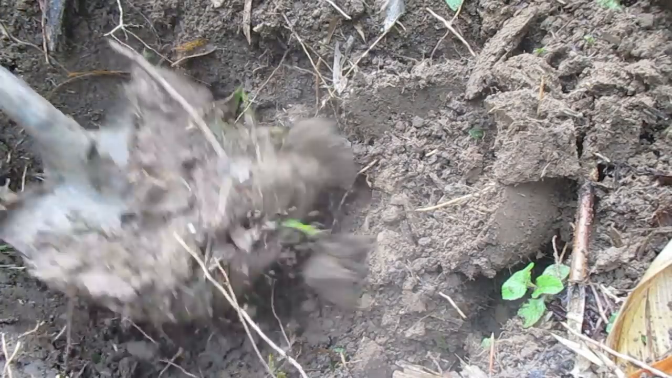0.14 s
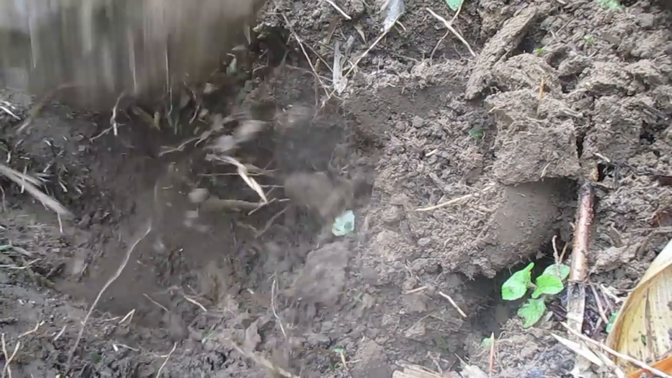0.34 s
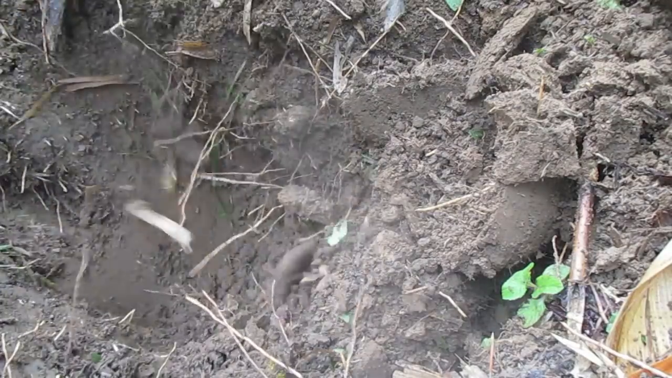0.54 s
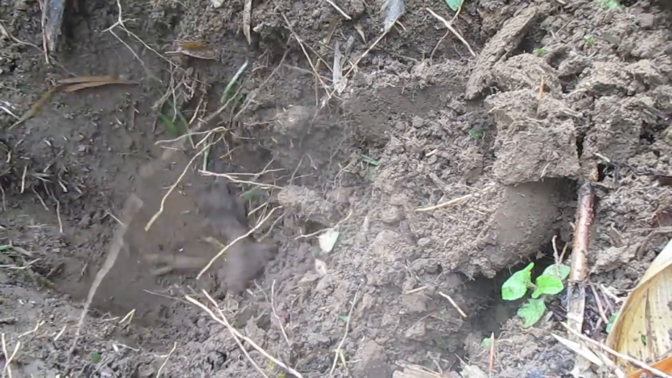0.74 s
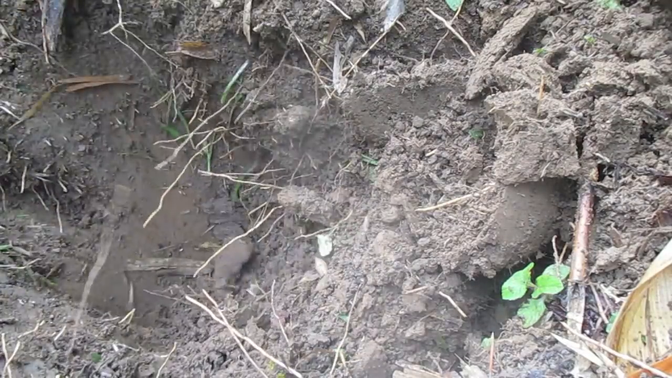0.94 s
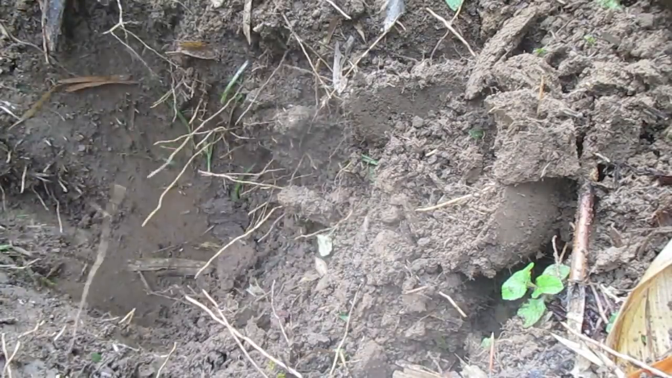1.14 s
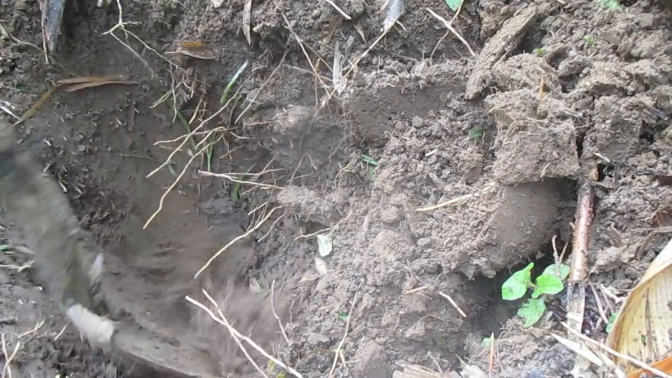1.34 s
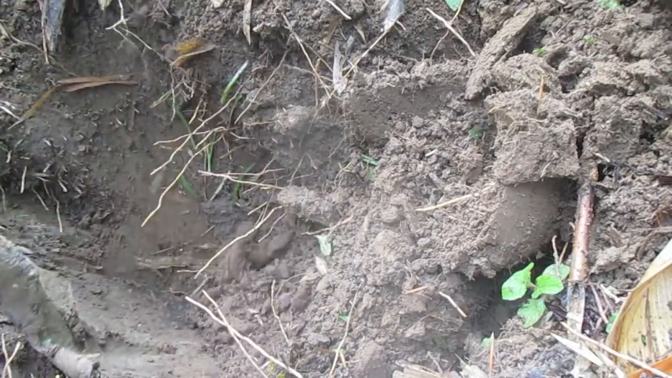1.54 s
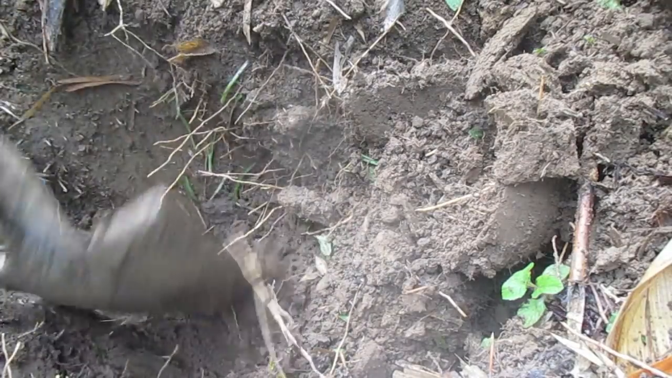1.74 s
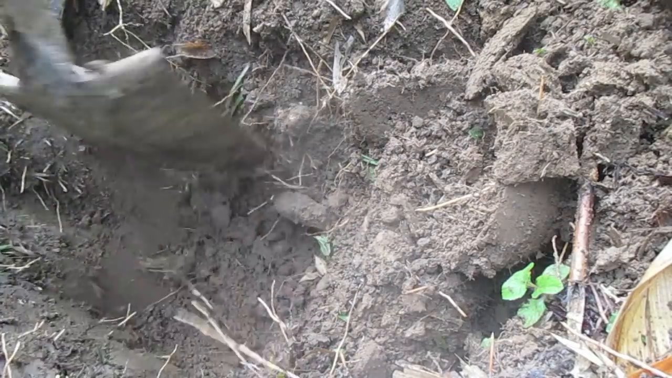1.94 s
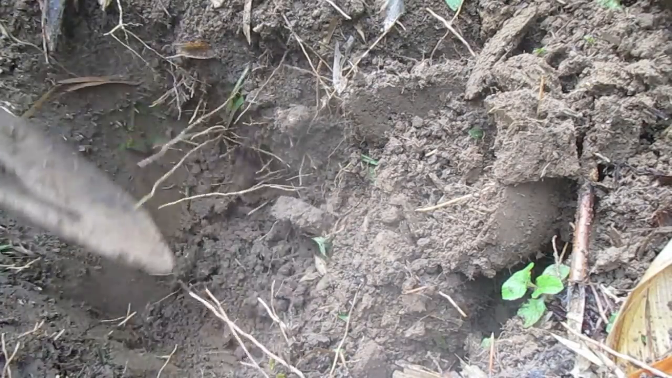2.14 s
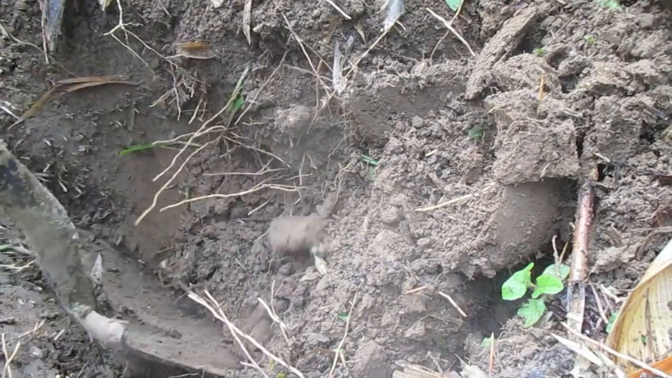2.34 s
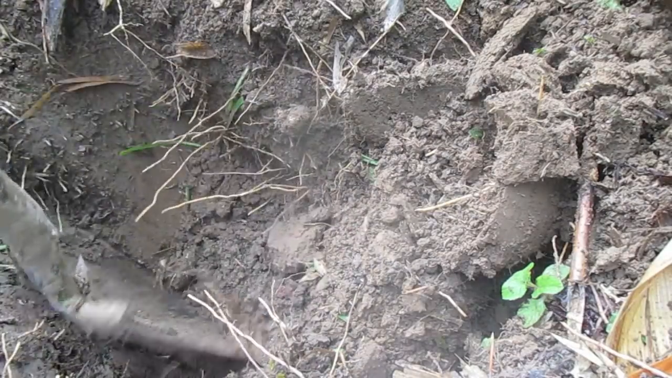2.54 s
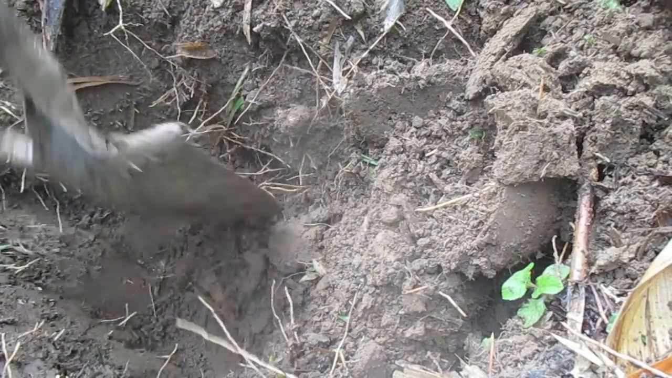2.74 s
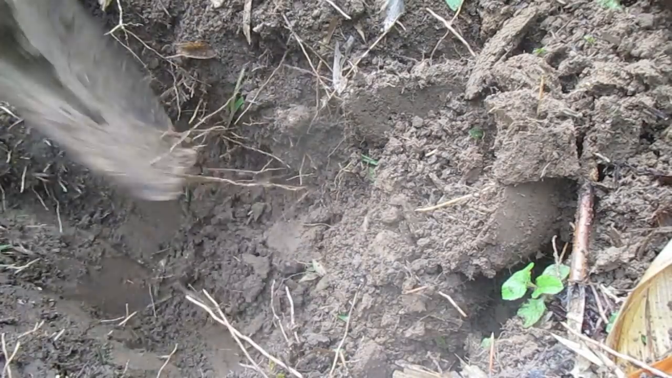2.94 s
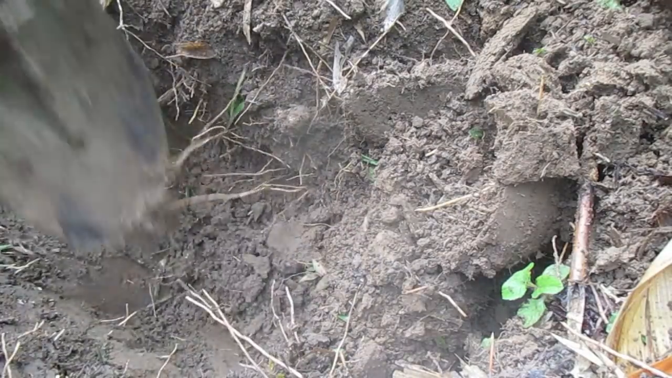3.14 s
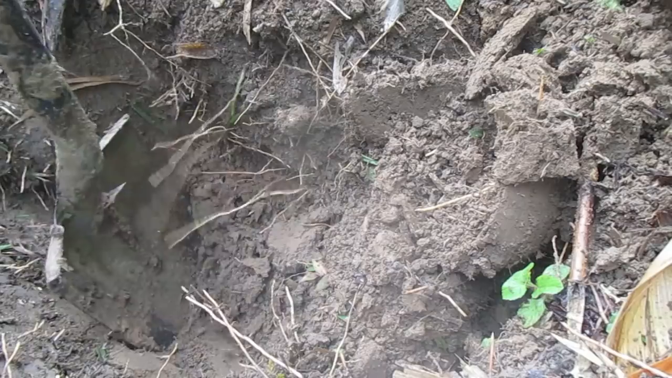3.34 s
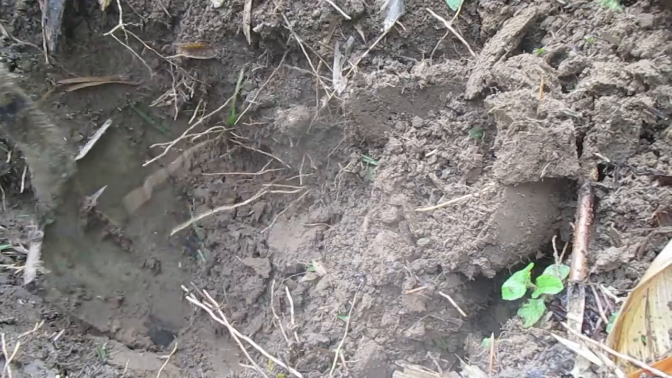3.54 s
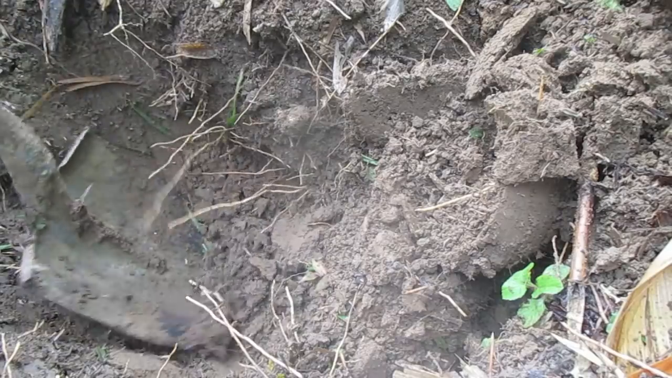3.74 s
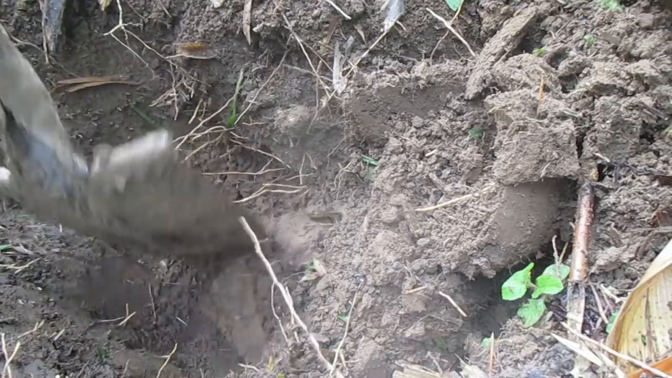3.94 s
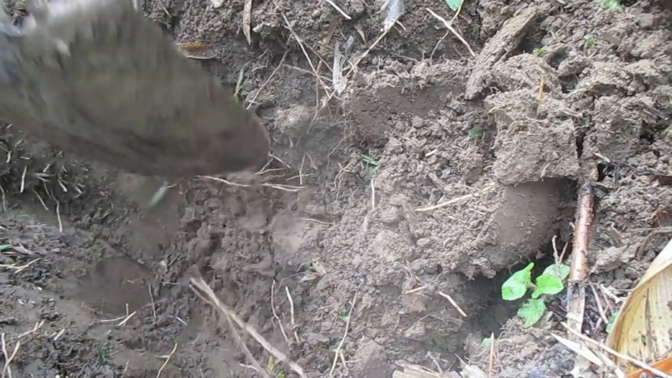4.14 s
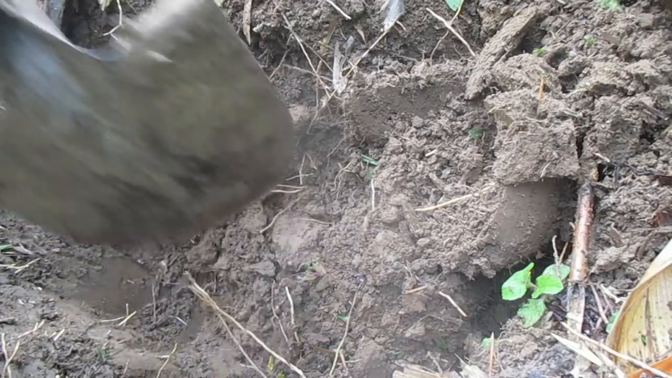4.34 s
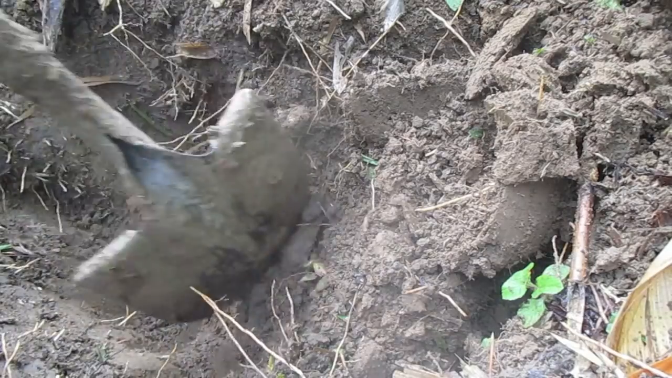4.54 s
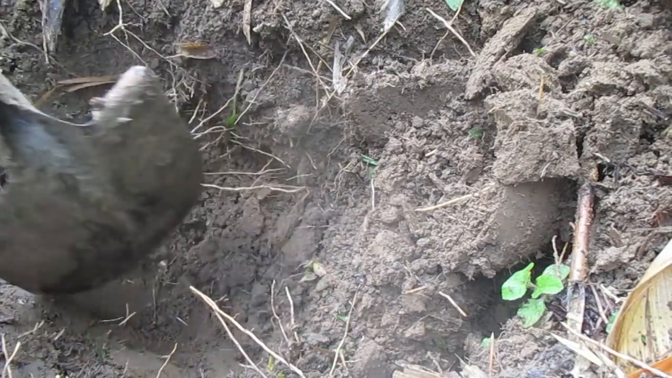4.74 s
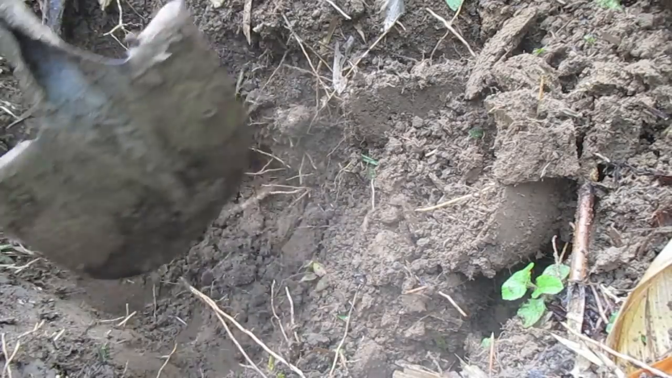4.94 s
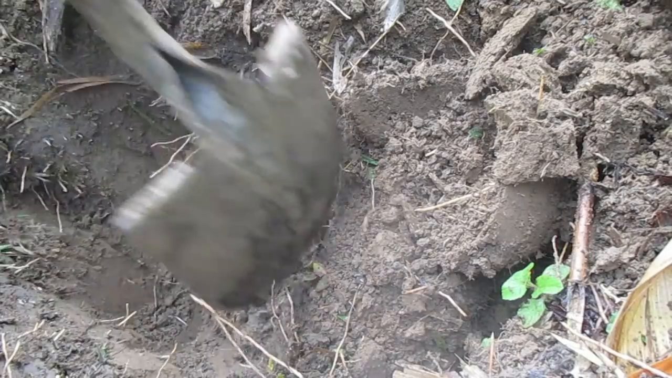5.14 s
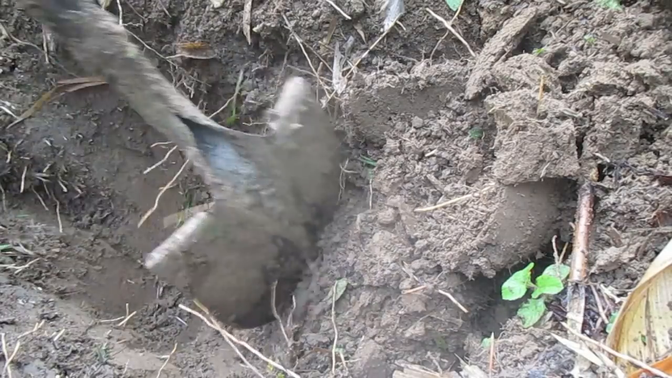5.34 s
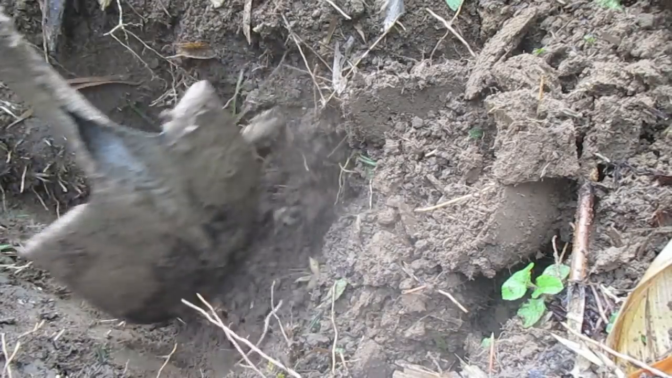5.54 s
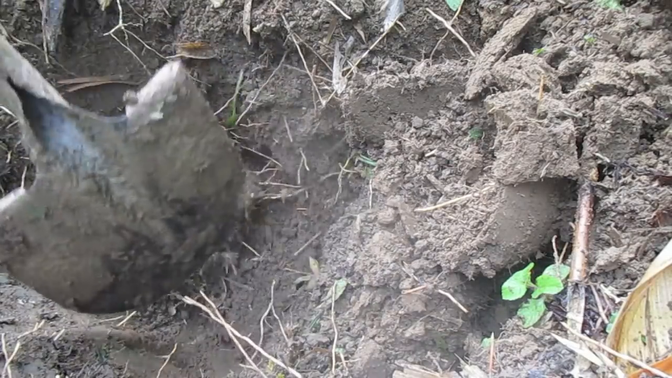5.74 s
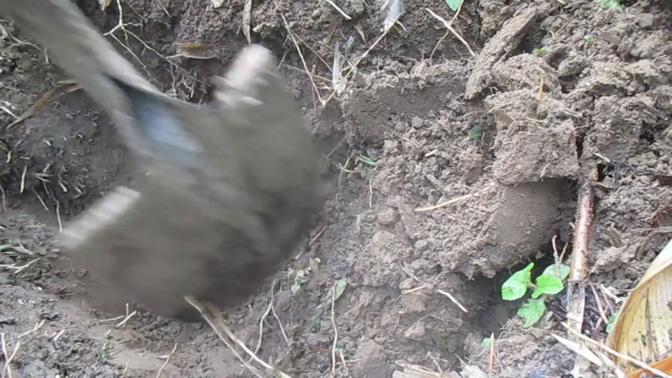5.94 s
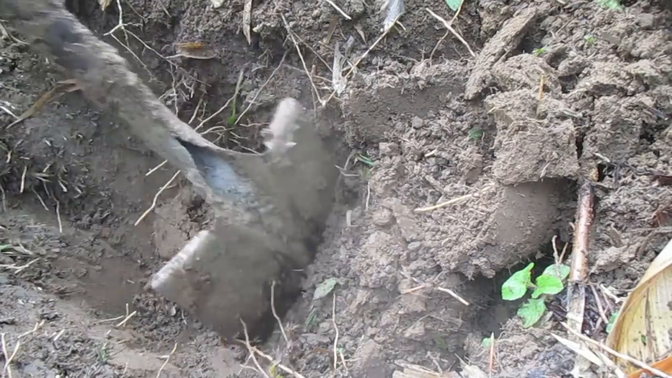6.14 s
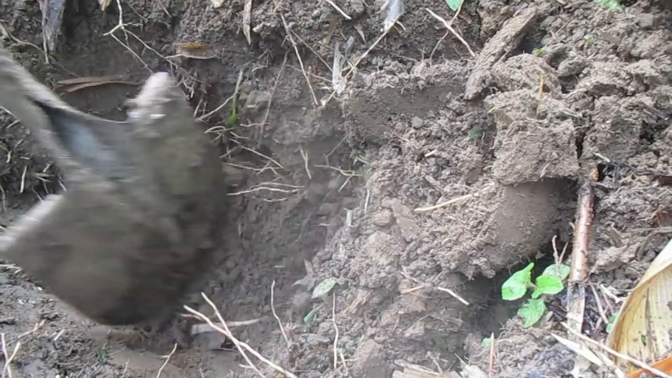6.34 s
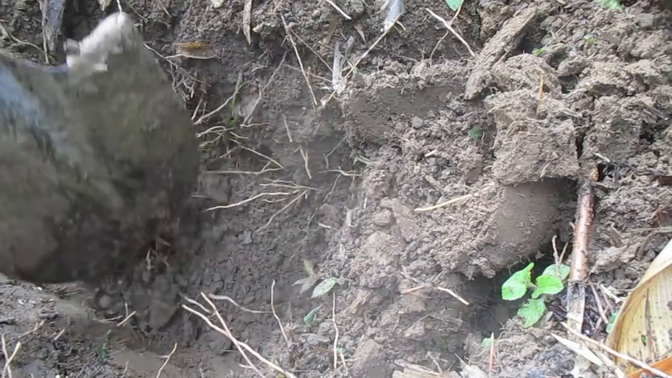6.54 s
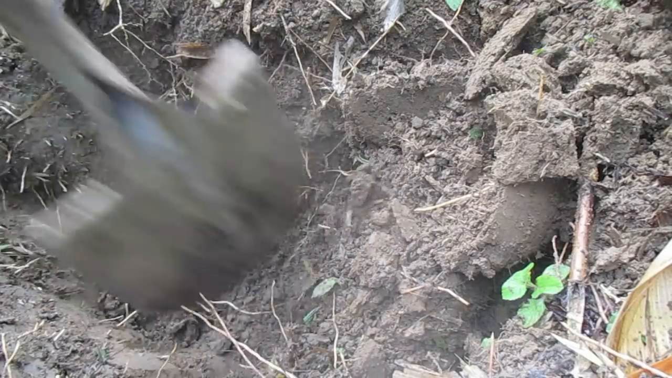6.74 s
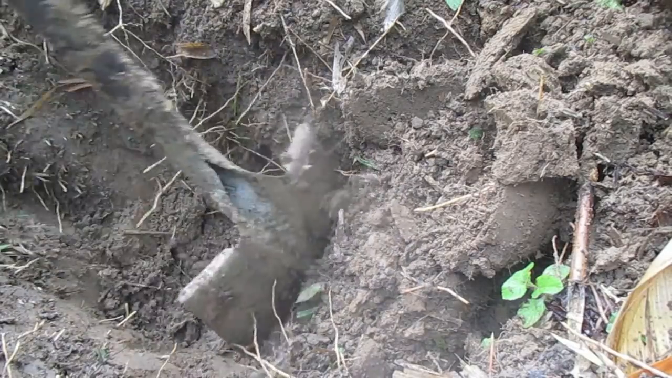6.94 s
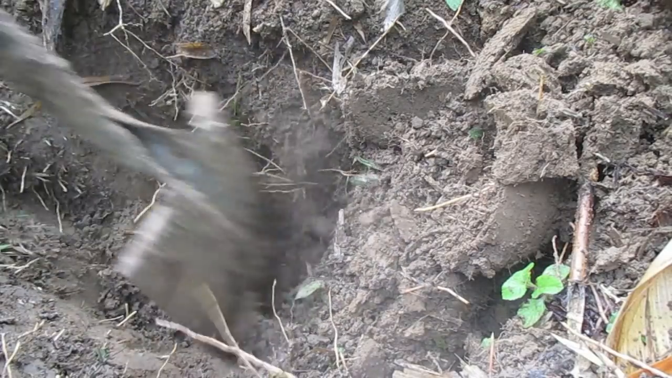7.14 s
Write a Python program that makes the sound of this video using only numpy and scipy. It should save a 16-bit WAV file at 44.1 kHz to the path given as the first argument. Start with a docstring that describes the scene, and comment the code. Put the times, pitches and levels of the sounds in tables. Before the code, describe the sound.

A steel spade stabs and scrapes gritty, rooty soil close by, with a hard early clank, crumbs ticking down, faint birds and insects behind.

```python
"""Spade in moist, rooty soil

A steel spade stabs and scrapes close by: shared noise grains drive blade resonances, grit hiss and earth crunch.
Stones and snapping roots ring the blade, heavy stabs knock the handle and thump the ground as decaying sines,
crumbs click. Behind: gliding sine bird notes, and shaped noise for rumble, air, leaves, insects and a cricket;
the noise follows tabled levels that dip after a hard stab.
"""
import sys
import numpy as np
from scipy import signal
from scipy.fft import rfft, irfft, next_fast_len
from scipy.io import wavfile
from scipy.ndimage import uniform_filter1d, map_coordinates

SR = 44100
rng = np.random.default_rng(int(sys.argv[2]) if len(sys.argv) > 2 else 0)


def dump_mix(stems):
    """Bounce the given channels to the path in sys.argv[1] as a 16-bit WAV at rate SR."""
    frames = np.atleast_2d(stems).T  # one column per channel
    limited = np.clip(frames, -1, 1)  # hard clip at full scale
    pcm = np.round(limited * 32767).astype(np.int16)
    wavfile.write(sys.argv[1], SR, pcm)


N = 320607

# Strokes through the soil. Each row: start of full level, rise, hold and fall in seconds, upper blade drive in dB,
# then lower blade, grit and earth drive in dB above it.
STROKE_ROWS = [(0.178, 0.056, 0.061, .05, -53, 8, -5, -13),
               (0.294, 0.094, 0.12, 0.055, -47.5, 2.5, -5.5, -10),
               (0.953, 0.042, 0.42, .05, -54, 4.5, 3.5, -4), (1.361, .006, .018, 0.01, -35, 0, 1, -10),
               (1.406, .006, 0.026, 0.026, -31.5, 1.5, -4, -3),
               (1.381, 0.0033, 0.0068, 0.04, -17.5, -6, -4.5, 6.5),
               (1.491, .06, .005, 0.24, -40, 1.5, -25, -5),
               (1.789, 0.17, 0.071, 0.016, -31.5, -2, -7.5, -7.5),
               (1.969, 0.047, 0.022, 0.031, -30, -10, -8, -16), (2.343, .012, .02, .02, -32.5, -2, -2.5, 1),
               (2.365, .03, .02, 0.039, -25, -1.5, -1, -4), (2.653, 0.11, 0.036, 0.093, -29, -4, -4.5, -6),
               (2.882, .006, 0.092, .012, -38, -8, -6, -11),
               (2.911, 0.036, .005, 0.076, -26, -3, -11.5, -17),
               (3.058, .09, .005, 0.083, -43.5, -7, -15, -6),
               (3.3206, .003, 0.028, 0.0094, -18.5, 4.5, -4, -2.5),
               (3.351, .003, .005, 0.079, -39, 0, 2, 1.5), (3.656, 0.33, 0.0079, 0.094, -36, -6, -16, -7),
               (3.81, .06, .02, .04, -36, -8, -13, -15), (3.868, .06, 0.026, .015, -28, -0.5, -7.5, -13),
               (3.902, .01, 0.11, 0.1, -37.5, -5, -7, -18),
               (4.544, .01, 0.056, 0.028, -33.5, -2.5, -2.5, -6),
               (4.653, 0.035, .025, 0.068, -31.5, -14, -5.5, -15.5),
               (4.702, .015, .008, 0.036, -33.5, -19, 2.5, -17),
               (4.741, 0.011, 0.043, 0.029, -24, -13, -12.5, -17.5),
               (4.812, .006, 0.044, 0.043, -31, -4, -10, -15),
               (4.877, .01, 0.049, .08, -39.5, -5, -11, -14),
               (5.172, 0.0018, 0.0054, 0.026, -21, -8.5, -18, -27),
               (5.202, .02, 0.035, .01, -41.5, -7, -12, -22),
               (5.268, 0.026, .005, 0.11, -24.5, -5.5, -3.5, -15),
               (5.463, 0.063, .005, 0.23, -35, -9.5, -5, -9.5),
               (5.596, 0.066, 0.011, 0.15, -27, -6, -6.5, -14), (5.695, 0.058, .04, 0.018, -43, 2, -1, -3),
               (5.755, .04, .015, .02, -34, -9, -5.5, -8.5),
               (6.066, .012, 0.051, .03, -29.5, -8, -4.5, -5.5),
               (6.105, 0.07, 0.032, 0.053, -29, -4, -2.5, -9), (6.246, 0.034, 0.14, .02, -37, -10, -7, -16),
               (6.346, 0.082, 0.061, 0.041, -30, -3, -3, -12.5),
               (6.466, .006, 0.044, .03, -41.5, 1, -1, -5), (6.52, 0.099, 0.0068, 0.023, -28, -9, -4, -23),
               (6.537, .01, 0.027, 0.054, -45, -1, -4, -7), (4.164, .04, 0.026, .05, -45.5, 0, 0, -5),
               (4.96, .01, 0.021, .03, -40, -10, -12, -17), (6.859, .006, .02, .01, -32, -7, -6, -3),
               (6.883, 0.009, 0.021, 0.05, -26, -0.5, 2, 1),
               (7.122, 0.066, 0.0045, 0.037, -32, -2, -2.5, -1.5),
               (7.177, 0.032, 0.061, 0.023, -30.5, -6, -1, -9.5),
               (7.254, 0.016, .01, .05, -27, -2, -2, -16)]
# Stones and root snaps on the blade. Each row: start in seconds, peak in dB before the blade trim,
# strongest pitch in Hz, treble in dB above peak before the treble trim.
TICK_ROWS = [(0.4143, -24, 2520, -16), (0.538, -16, 2530, -10.5), (0.5766, -27, 1290, -11),
             (1.2246, -25.5, 4390, -8), (1.3635, -23.5, 3400, -9), (1.3819, -2, 2300, -17),
             (1.4803, -21, 1920, -33), (1.5796, -24, 1790, -10.5), (1.7433, -28, 2620, -15),
             (1.7772, -16, 3520, -10), (1.829, -14, 1540, -12.5), (1.9086, -43, 1330, -12),
             (1.925, -13, 2280, -25), (1.9704, -14.5, 2950, -18), (2.0586, -19.5, 5180, -3),
             (2.3444, -23, 1290, -25), (2.365, -20, 2970, -10), (2.3826, -7, 2650, -7),
             (2.506, -26.5, 1930, -16), (2.5364, -23, 1470, -19), (2.5944, -17, 3140, -12.5),
             (2.6455, -11.5, 1650, -19), (2.8812, -17, 2760, -17), (2.9118, -16, 3070, -25),
             (2.9149, -8, 2070, -14), (3.3258, -3, 1190, -35), (3.4283, -30, 2570, -9),
             (3.6657, -8, 2470, -21.5), (3.8494, -20, 1770, -31), (3.8685, -10, 1790, -33),
             (3.9429, -11, 905, -19), (4.5454, -21.5, 1800, -5.5), (4.5675, -20, 3220, -21),
             (4.6546, -17.5, 3100, -19), (4.7058, -28, 3250, 1), (4.7387, -19.5, 3170, -7),
             (4.759, -14, 3270, -26), (4.773, -18, 2400, -21), (4.79, -16, 3600, -23),
             (4.8088, -15, 3230, -21), (5.1721, -22, 1590, -17), (5.261, -11.5, 3000, -24),
             (5.5889, -13, 2450, -17), (5.691, -19, 1370, -22), (5.7563, -22, 3040, -9),
             (5.8721, -19.5, 3170, -15), (6.022, -13.5, 3180, -20), (6.0544, -19, 2690, -26),
             (6.3345, -17, 2260, -20), (6.3545, -18, 2380, -1), (6.3965, -12, 2060, -12.5),
             (6.4667, -38, 2920, 5), (6.4918, -20, 2930, -16), (6.531, -10, 4330, -8),
             (6.8583, -11.5, 4600, -6.5), (6.8833, -12, 1710, -21), (7.111, -20.5, 3000, -11),
             (7.1214, -12, 1940, -12), (7.1673, -24, 2140, -16), (7.1873, -13, 2140, -13),
             (7.2562, -7.5, 2190, -16)]
# Heavy stabs. Each row: start in seconds, handle drive in dB, knock pitch in Hz, ground drive in dB above handle.
STAB_ROWS = [(1.381, -0.5, 399, -43), (1.968, -28, 131, -24), (2.344, -21, 171, -42),
             (2.367, -21.5, 170, -28), (2.681, -15, 190, -29), (2.909, -33, 162, -27),
             (3.33, -12, 251, -26), (3.341, -14, 253, -37), (3.665, -28, 560, -34), (4.546, -28, 470, -36),
             (4.849, -32, 133, -20), (5.252, -30, 336, -29), (6.394, -22.5, 556, -43),
             (6.8831, -2.5, 381, -37), (7.117, -20, 558, -32)]
# Handle modes. Each row: multiple of knock pitch, level in dB, t60 in seconds.
HANDLE_MODES = [(1, 3, 0.039), (.47, -11, 0.05), (.65, 0, 0.029), (1.35, -19, 0.02), (2.0, -9, 0.014)]
# Ground mode. Each row: frequency in Hz, level in dB, t60 in seconds.
GROUND_MODES = [(47.5, 19, 0.26)]
# Blade modes as scraped (ticks damp them harder). Each row: frequency in Hz, width in Hz, level in dB.
BLADE_MODES = [(891, 41, -11), (1198, 19, -5.5), (1460, 66, -6.5), (1807, 28.4, 4), (1890, 58, 1),
               (2156, 76, 7.5), (2306, 22, -6), (2640, 53, 7), (2980, 170, 6), (2990, 73, 11),
               (3360, 160, -2.5), (3590, 25, -2.5), (4400, 58, -13), (4910, 110, -2)]
# Broad voice of the soil-loaded steel. Each row: frequency in Hz, gain in dB.
SLAB_GAIN = [(600, -58), (1000, -10.5), (2500, 3), (4000, -19.5), (6000, -73)]
# Grit spectrum. Each row: frequency in Hz, relative density in dB per Hz.
GRIT_SPECTRUM = [(2350, -9), (4000, -2), (5530, -1.5), (6020, -2), (11200, -5), (14500, -16), (15500, -20)]
# Packed soil round the blade, applied twice. Each row: frequency in Hz, width in Hz, level in dB.
EARTH_MODES = [(204, 93, 0.5), (445, 240, 2), (765, 257, 0.5)]
# Crumbs landing. Each row: start in seconds, peak in dB before the high-pass, pitch in Hz.
CRUMB_ROWS = [(0.321, -26, 2540), (0.4698, -34, 2460), (0.804, -25, 5300), (0.8634, -33, 2450),
              (0.982, -27, 3660), (1.544, -28, 3050), (1.6144, -32.5, 5500), (2.5525, -26, 2480),
              (2.795, -25.5, 4700), (3.2593, -26, 2610), (3.482, -28, 2476), (5.089, -31, 5630),
              (5.224, -26, 2400), (6.953, -32, 5820)]
# Bird notes. Each row: start in seconds, length in seconds, start Hz, end Hz, peak in dB before flutter.
BIRD_NOTES = [(0.447, 0.24, 1870, 1650, -49), (2.087, 0.056, 3300, 3250, -53),
              (2.17, .045, 3200, 3100, -52), (0.698, 0.015, 7140, 7750, -35.5),
              (0.776, .02, 7450, 7550, -44), (2.123, 0.015, 7200, 7700, -41),
              (3.078, 0.013, 7500, 7860, -42), (4.83, 0.097, 4870, 4650, -49),
              (6.168, .013, 5150, 4650, -49), (6.203, 0.012, 5200, 4580, -45),
              (6.24, 0.012, 5240, 4620, -41), (6.276, 0.014, 5300, 4640, -40),
              (6.736, 0.15, 3380, 3050, -56), (6.758, .03, 4450, 4350, -56),
              (6.819, 0.033, 5370, 5000, -46)]
# Background levels as the recorder's gain rides, dipping after the hard stab.
# Each row: time in seconds, high hiss in dB, rumble in dB.
BACKGROUND_LEVELS = [(0.0, -56.5, -49), (0.69, -49.5, -42.5), (0.97, -51, -39.5), (1.27, -51, -42),
                     (1.42, -51.5, -48), (1.66, -63, -51.5), (1.92, -53.5, -45), (2.89, -51.5, -44.5),
                     (3.6, -51.5, -45.5), (3.85, -48, -42), (4.84, -52, -44.5), (6.23, -52, -42),
                     (7.03, -52, -44), (7.27, -50.5, -50)]
# Far rumble spectrum. Each row: frequency in Hz, relative density in dB per Hz.
RUMBLE_SPECTRUM = [(20, -32), (40, -13.5), (80, -8.5), (130, -2), (190, -10.5), (280, -29), (400, -58)]
# Moving air spectrum. Each row: frequency in Hz, relative density in dB per Hz.
AIR_SPECTRUM = [(200, -2), (300, -2.5), (545, 1), (900, -5), (1400, -4.5), (2200, -20)]
# Leaf rustle spectrum. Each row: frequency in Hz, relative density in dB per Hz.
LEAF_SPECTRUM = [(900, -20), (1500, 0.5), (2500, 0.5), (3800, -4.5), (6500, -7), (15000, -24.5)]
# Insect chorus spectrum. Each row: frequency in Hz, relative density in dB per Hz.
CHORUS_SPECTRUM = [(6900, -12), (7500, 1), (7900, 5), (8600, 5), (9300, 9.5), (10100, -1), (11000, 7),
                   (11700, -0.5), (12000, -5), (12600, -14)]
# Cricket phrases. Each row: start in seconds, length in seconds.
CRICKET_PHRASES = [(.45, 0.19), (0.847, .5), (2.0, 0.11), (2.2, .12), (2.8, 0.61), (3.38, .25), (4.05, .42),
                   (4.95, .25), (5.82, 0.22), (6.6, 0.28)]

SWING_DB = 30  # climb of a stroke over its rise, drop over its fall
BLADE_TRIM_DB, GRIT_TRIM_DB = -5.5, -0.9  # scraping
TICK_BLADE_TRIM_DB, TICK_TREBLE_TRIM_DB = -4.0, 8.5
TRICKLE_PER_S, TRICKLE_FLOOR_DB, TRICKLE_SPREAD_DB, TRICKLE_HZ = 34, -45.5, 3, 4500  # small loose crumbs
AIR_DB, LEAVES_DB, CRICKET_DB = 1, -1, -8.5  # above the high hiss (air: above its mean)
AIR_SWING = 1.35  # air level swing, as a multiple of the high hiss's
TOP_HZ = 15900


def scraping():
    """Grains shake the blade, hiss as grit and crunch the earth; clinging soil damps modes moment to moment."""
    upper_db, lower_db, grit_db, earth_db = effort()
    grains = chatter(fast_db=3, slow_db=2.5, spike_db=3.0)

    def voice(response, db):
        return filtered(amp(db) * grains, response) / np.std(filtered(grains, response))

    def above(hz):
        return 1 / (1 + (1670 / (hz + 1)) ** 12)

    upper = voice(lambda hz: steel(hz) * above(hz), upper_db)
    lower = voice(lambda hz: steel(hz) * (1 - above(hz)), lower_db)
    blade = patchy(upper + lower, window=256, bins=2, frames=12, spread_db=2.5, trim_db=BLADE_TRIM_DB)
    grit = voice(colour(GRIT_SPECTRUM), grit_db)
    grit = patchy(grit, window=128, bins=6, frames=4, spread_db=2.3, trim_db=GRIT_TRIM_DB)
    earth = voice(lambda hz: resonances(EARTH_MODES, hz) ** 2, earth_db)
    return blade + grit + earth


def effort():
    """Drive in dB of the four voices: each stroke rises, holds, falls; overlapping strokes add power."""
    power = np.full((4, N), 1e-12)
    t = np.arange(N) / SR
    for s, rise, hold, fall, db, *above_db in STROKE_ROWS:
        near = slice(max(round((s - 2 * rise) * SR), 0), round((s + hold + 2 * fall) * SR))
        before = (s - t[near]) / rise
        after = (t[near] - s - hold) / fall
        shape_db = -SWING_DB * np.maximum(0, np.maximum(before, after))
        voices_db = db + np.array([0, *above_db])[:, None]
        power[:, near] += amp(2 * (voices_db + shape_db))
    return 10 * np.log10(power)


def chatter(fast_db, slow_db, spike_db):
    """Clumped noise with sparse hard grains standing out of it."""
    spikes = amp(spike_db * rng.exponential(size=N))
    clumps = amp(fast_db * wobble(600) + slow_db * wobble(70))
    return unit(rng.standard_normal(N) * spikes * clumps)


def patchy(x, window, bins, frames, spread_db, trim_db):
    """Random gain over time and frequency, smoothed across bins and frames."""
    z = signal.stft(x, nperseg=window)[2]
    patches = uniform_filter1d(rng.standard_normal(z.shape), size=bins, axis=0)
    patches = unit(uniform_filter1d(patches, size=frames, axis=1))
    return signal.istft(z * amp(spread_db * patches + trim_db), nperseg=window)[1][:N]


def steel(f):
    """Damped blade modes over the broad voice of the slab."""
    return resonances(BLADE_MODES, f) + colour(SLAB_GAIN)(f)


def ticks():
    """A contact rattles for milliseconds, rings blade modes nearest its pitch and spits a puff of grit."""
    low, high = np.zeros(N + SR), np.zeros(N + SR)
    t = np.arange(SR // 12) / SR
    n = len(t)
    hz, width_hz, level_db = np.transpose(BLADE_MODES)[:, :, None]
    signs = (-1) ** np.arange(len(hz))[:, None]
    swings = signs * np.exp(-np.pi * 3.5 * width_hz * t) * np.sin(2 * np.pi * hz * t)  # 3.5: extra damping
    rattle = amp(-60 * t / 0.0065) + .5 * amp(-60 * t / 0.027)
    puff = amp(-60 * t / 0.003) + .5 * amp(-60 * t / 0.024)
    for s, db, pitch_hz, treble_db in TICK_ROWS:
        octaves_off = np.abs(np.log2(hz / pitch_hz))
        near_db = level_db - 19 * octaves_off + 3 * rng.standard_normal(hz.shape)
        modes = np.sum(amp(near_db) * swings, axis=0)
        rung = signal.fftconvolve(modes, rattle * rng.standard_normal(n))[:n]
        start = round(s * SR)
        low[start:][:n] += amp(db) * rung / np.abs(rung).max()
        high[start:][:n] += amp(db + treble_db) * puff * rng.standard_normal(n)
    treble = filtered(high[:N], colour(GRIT_SPECTRUM))
    return amp(TICK_BLADE_TRIM_DB) * low[:N] + amp(TICK_TREBLE_TRIM_DB) * treble


def stabs():
    """The shaft knocks at a pitch set by the soil's grip; the ground swells into a slow thump."""
    out, t = np.zeros(N + SR), np.arange(SR // 2) / SR
    thump = ring(GROUND_MODES, t) * (1 - np.exp(-t / 0.018))
    for s, db, knock_hz, thump_db in STAB_ROWS:
        modes = [(k * knock_hz, level_db, t60) for k, level_db, t60 in HANDLE_MODES]
        knock = ring(modes, t) * (1 - np.exp(-t / 0.00091))
        out[round(s * SR):][:len(t)] += amp(db) * (0.75 * knock + amp(thump_db) * thump)
    return out[:N]


def crumbs():
    """A dry click of about one cycle, fizzing for milliseconds; small ones trickle at random."""
    out, t = np.zeros(N + SR), np.arange(SR // 50) / SR
    when, size, pitch = rng.random((3, int(TRICKLE_PER_S * N / SR)))
    trickle_db = TRICKLE_FLOOR_DB - TRICKLE_SPREAD_DB * np.log(size)
    trickle_hz = TRICKLE_HZ * 2 ** (2 * pitch - 1)  # within an octave either way
    trickle = zip(when * N / SR, trickle_db, trickle_hz)
    for s, db, hz in [*CRUMB_ROWS, *trickle]:
        click = np.exp(-1.3 * hz * t) * np.sin(2 * np.pi * hz * t)
        fizz = amp(-60 * t / 0.017) * rng.standard_normal(len(t))
        burst = signal.fftconvolve(click, fizz)[:len(t)]
        out[round(s * SR):][:len(t)] += amp(db) * burst / np.abs(burst).max()
    return filtered(out[:N], lambda f: f * f / (f * f + 1200 ** 2))


def birds():
    """Short gliding whistles, roughened by the leaves between."""
    out = np.zeros(N + SR)
    flutter_db = 3 * wobble(250) + 1.5 * wobble(40)
    for s, length_s, from_hz, to_hz, db in BIRD_NOTES:
        u = np.linspace(0, 1, round(length_s * SR))
        start = round(s * SR)
        level = amp(db + flutter_db[start:][:len(u)]) * np.sin(np.pi * u)
        cycles = np.cumsum(from_hz + (to_hz - from_hz) * u) / SR
        out[start:][:len(u)] += level * np.sin(2 * np.pi * cycles)
    return out[:N]


def garden():
    """Far rumble, moving air, rustling leaves, hissing insects and a cricket, each noise of its own colour."""
    hiss_db, rumble_db = curves(BACKGROUND_LEVELS)
    mean_db = hiss_db.mean()
    air_db = mean_db + AIR_DB + AIR_SWING * (hiss_db - mean_db)
    rumble = amp(rumble_db + 0.84 * wobble(24)) * noise(colour(RUMBLE_SPECTRUM))
    air = amp(air_db + 1.1 * wobble(9)) * noise(colour(AIR_SPECTRUM))
    leaves = amp(hiss_db + LEAVES_DB + 0.73 * wobble(12)) * noise(colour(LEAF_SPECTRUM))
    chorus = amp(hiss_db + 0.2 * wobble(4.1)) * noise(colour(CHORUS_SPECTRUM))
    return rumble + air + leaves + chorus + cricket(hiss_db)


def cricket(hiss_db):
    """Narrow noise band with a wavering level, louder in phrases."""
    centre_hz, width_hz = 5750, 300
    band = noise(lambda f: np.exp(-((f - centre_hz) / width_hz) ** 2))
    t = np.arange(N) / SR
    phrases = sum(1. * (abs(t - s - length_s / 2) < length_s / 2) for s, length_s in CRICKET_PHRASES)
    singing = uniform_filter1d(0.23 + phrases, size=SR // 20)  # 50 ms edges
    level_db = hiss_db + CRICKET_DB + 1.9 * wobble(22) + 2.9 * wobble(90)
    return singing * amp(level_db) * band


def amp(db):
    """Amplitude of a level in dB."""
    return 10 ** (np.asarray(db) / 20)


def unit(x):
    """x at unit RMS."""
    return x / np.sqrt(np.mean(x ** 2) + 1e-20)


def curves(rows):
    """One value per sample for each column after the time."""
    s, *cols = np.transpose(rows)
    return [np.interp(np.arange(N) / SR, s, c) for c in cols]


def wobble(knots_per_s):
    """Smooth random curve through Gaussian knots."""
    knots = rng.standard_normal(int(N * knots_per_s / SR) + 4)
    return map_coordinates(knots, [np.arange(N) * knots_per_s / SR])


def filtered(x, response):
    """x times a (possibly complex) response of frequency."""
    m = next_fast_len(N + SR // 2)
    return irfft(rfft(x, m) * response(np.fft.rfftfreq(m, 1 / SR)), m)[:N]


def noise(response):
    """Unit-RMS Gaussian noise shaped by a response."""
    return unit(filtered(rng.standard_normal(N), response))


def colour(points):
    """Gain of (Hz, dB) points on a log axis, closed at both ends."""
    f, db = np.transpose(points)
    return lambda hz: amp(np.interp(np.log(hz + 1), np.log(f), db, -120, -120))


def resonances(modes, f):
    """Causal sum of (Hz, width Hz, dB) resonances, alternating in sign."""
    total = 0
    for k, (hz, width_hz, db) in enumerate(modes):
        damping = 1j * f * width_hz
        total = total + (-1) ** k * amp(db) * damping / (hz * hz - f * f + damping)
    return total


def ring(modes, t):
    """Sum of decaying (Hz, dB, t60 s) modes, first swing downwards."""
    return -sum(amp(db - 60 * t / t60) * np.sin(2 * np.pi * hz * t) for hz, db, t60 in modes)


def scene():
    """Sum of all sources, one channel."""
    return (scraping() + ticks() + stabs() + crumbs() + birds() + garden())[None]


def record(dry):
    """The converter clips at full scale; top treble is shelved 22 dB down, then cut at TOP_HZ."""
    def treble_limit(hz):
        shelf_db = -22 / (1 + np.exp((15150 - hz) / 60))
        return (hz < TOP_HZ) * amp(shelf_db)

    return filtered(np.clip(dry[0], -1, 1), treble_limit)[None]


dry = scene()
out = record(dry)
dump_mix(out)
```